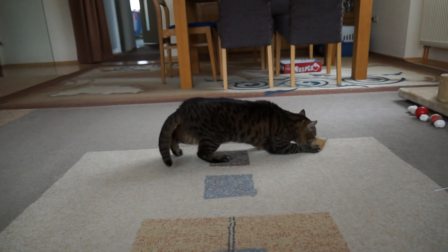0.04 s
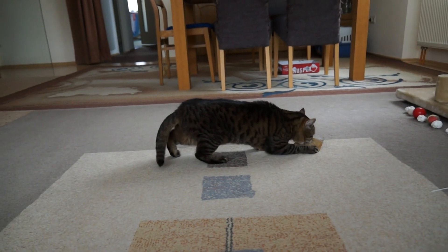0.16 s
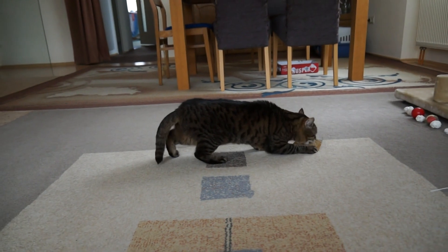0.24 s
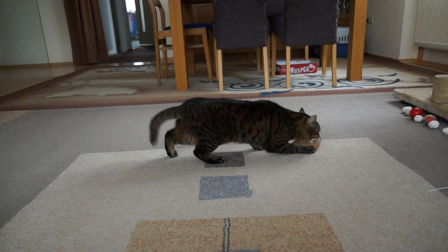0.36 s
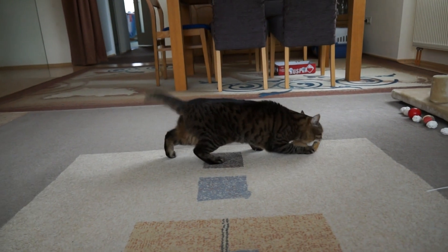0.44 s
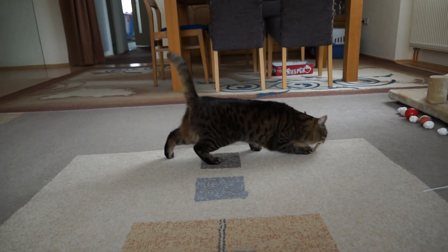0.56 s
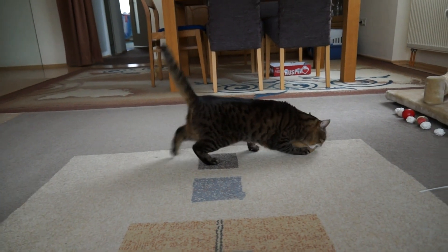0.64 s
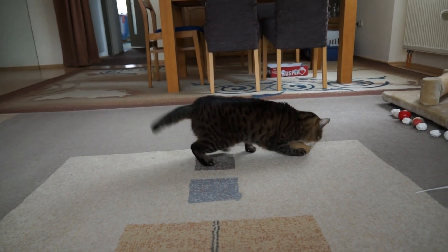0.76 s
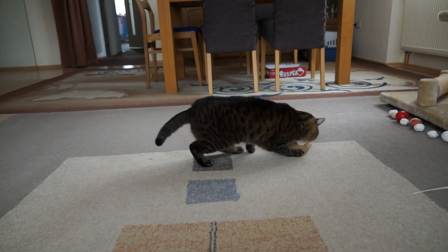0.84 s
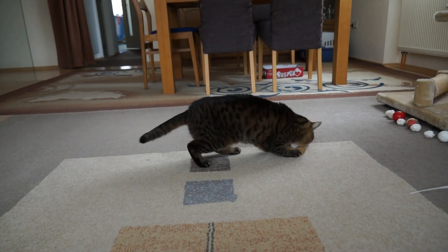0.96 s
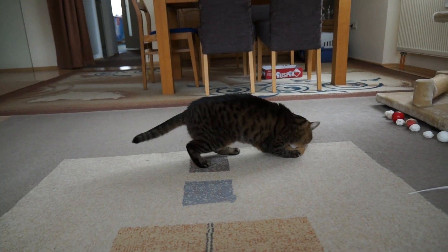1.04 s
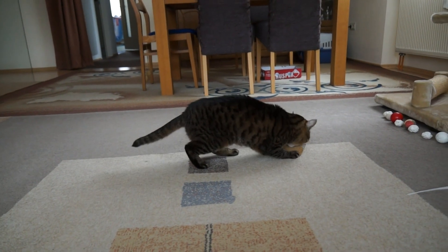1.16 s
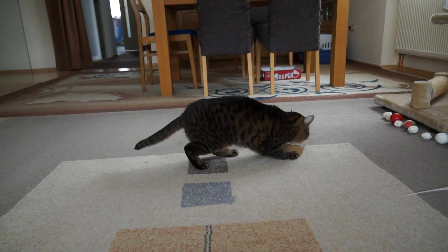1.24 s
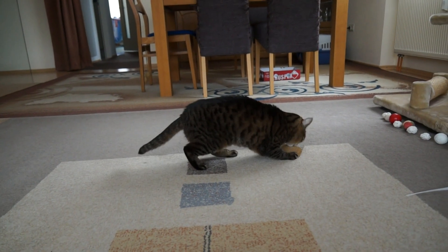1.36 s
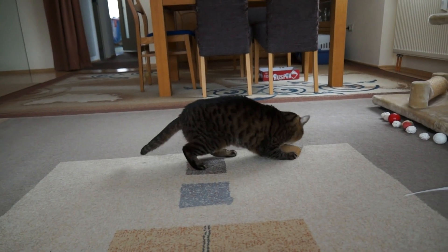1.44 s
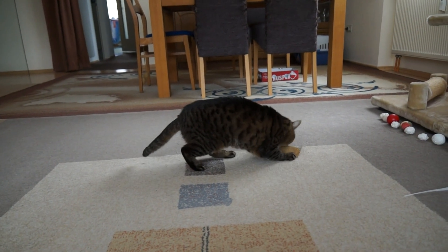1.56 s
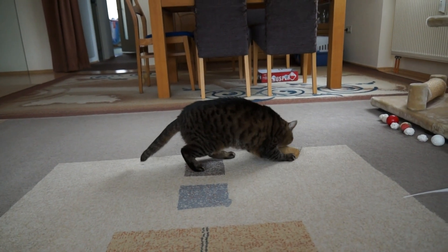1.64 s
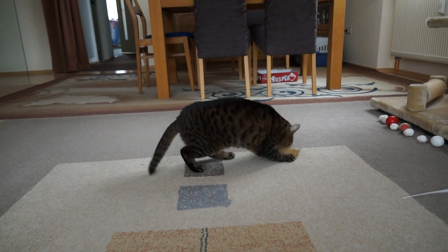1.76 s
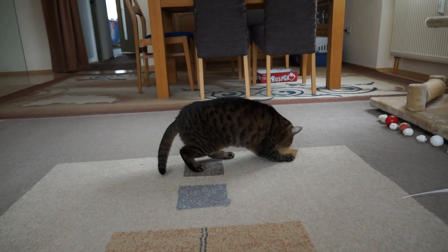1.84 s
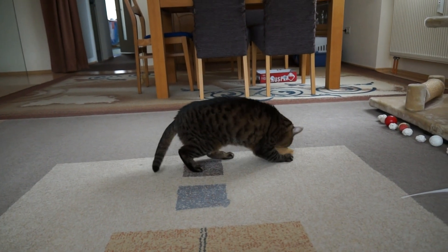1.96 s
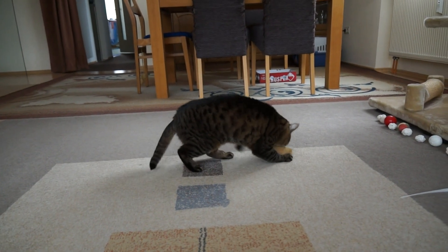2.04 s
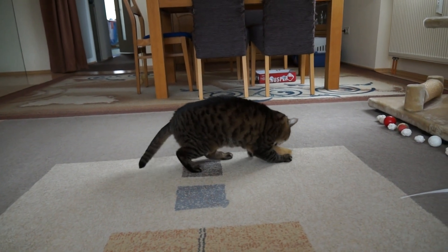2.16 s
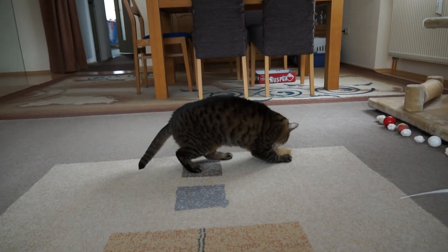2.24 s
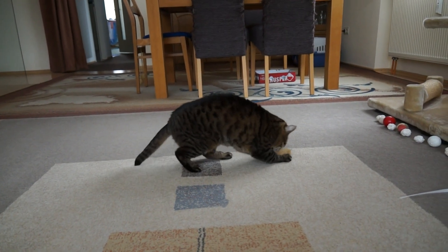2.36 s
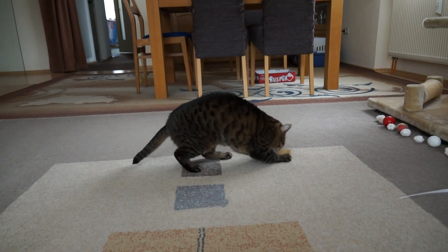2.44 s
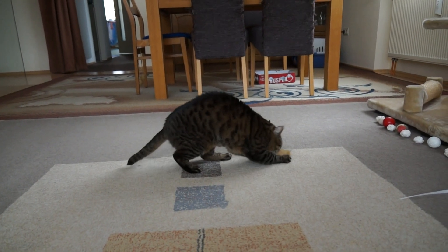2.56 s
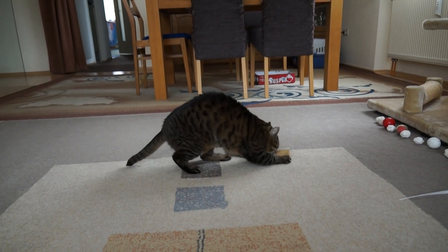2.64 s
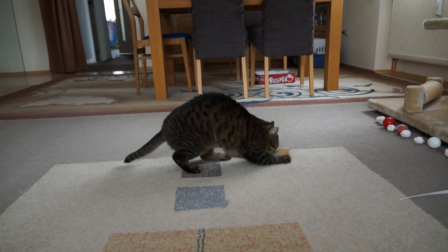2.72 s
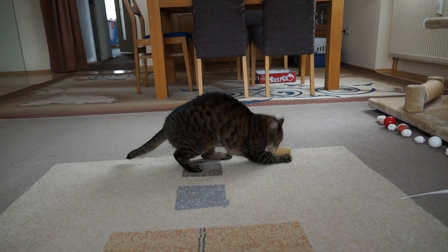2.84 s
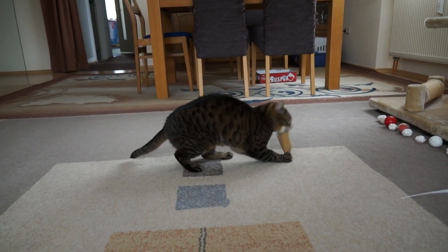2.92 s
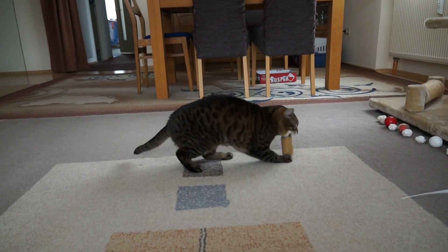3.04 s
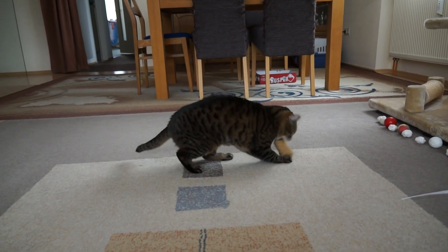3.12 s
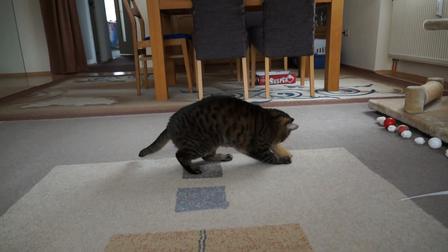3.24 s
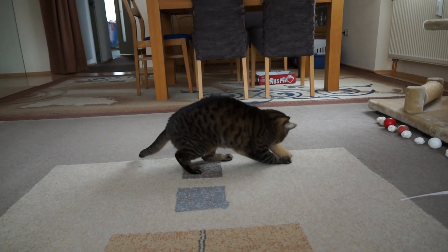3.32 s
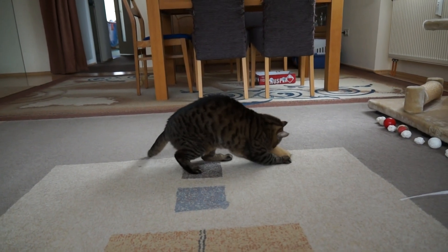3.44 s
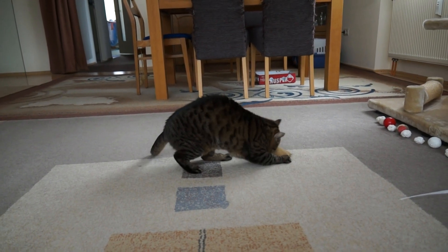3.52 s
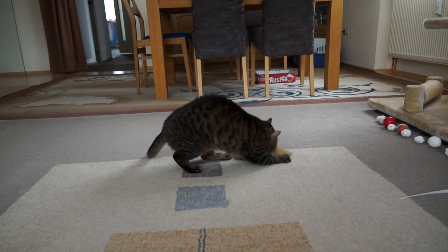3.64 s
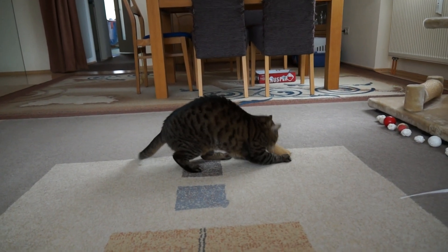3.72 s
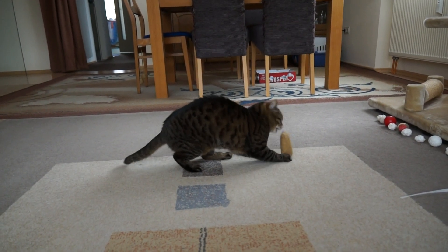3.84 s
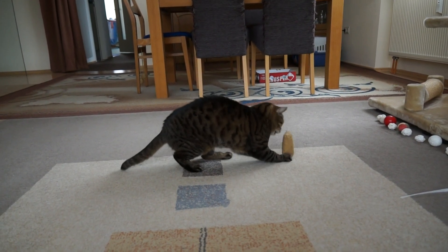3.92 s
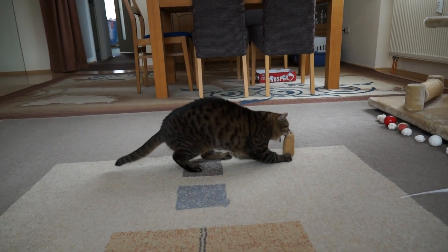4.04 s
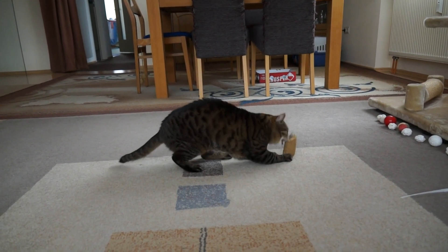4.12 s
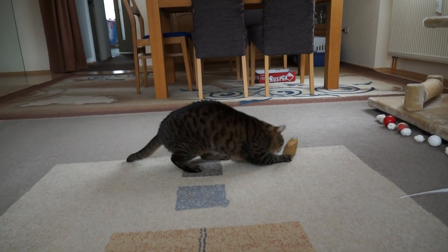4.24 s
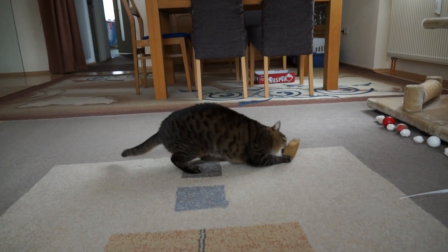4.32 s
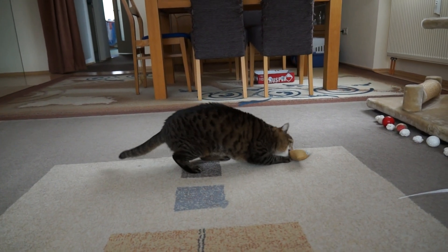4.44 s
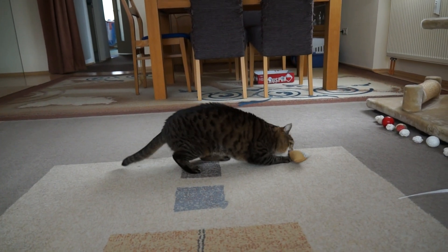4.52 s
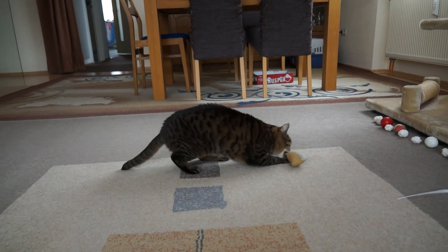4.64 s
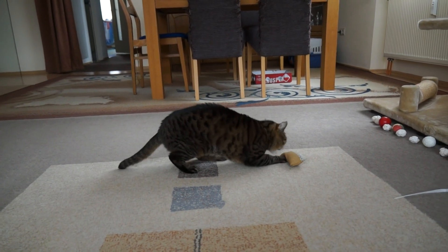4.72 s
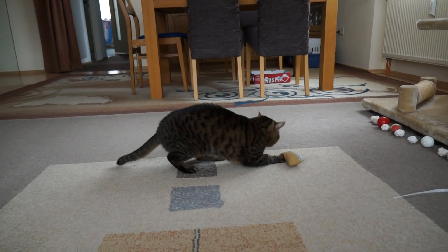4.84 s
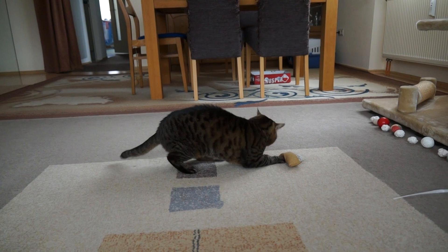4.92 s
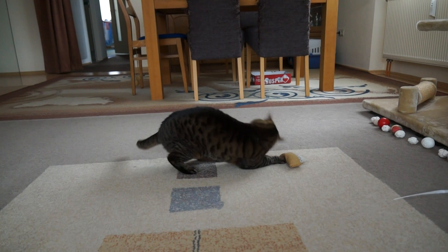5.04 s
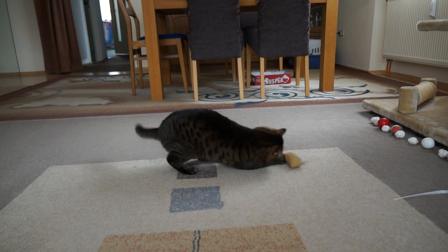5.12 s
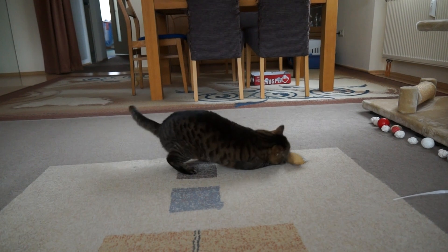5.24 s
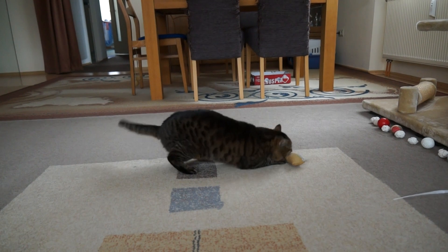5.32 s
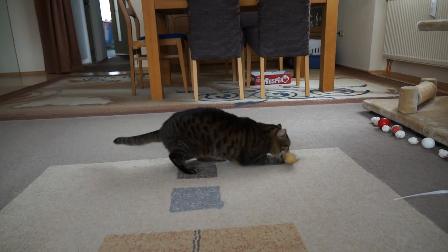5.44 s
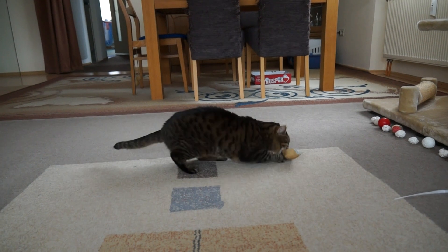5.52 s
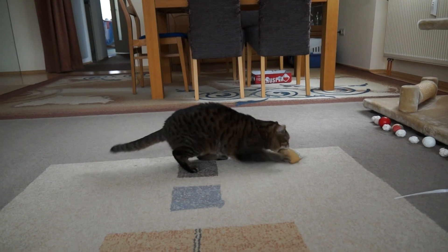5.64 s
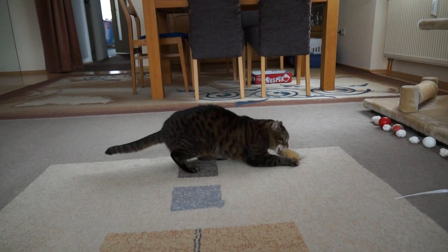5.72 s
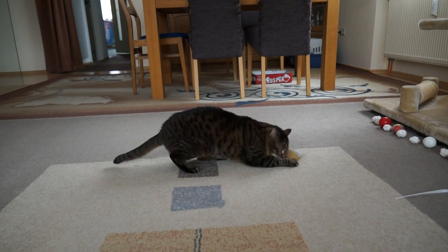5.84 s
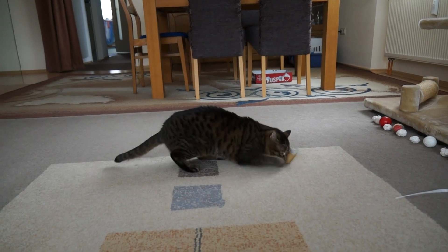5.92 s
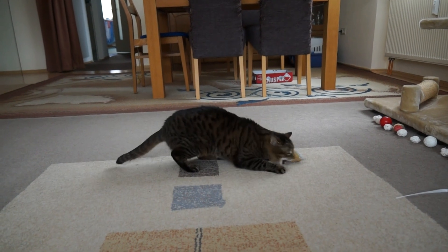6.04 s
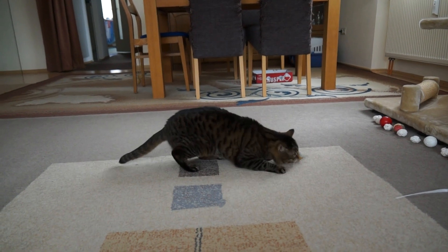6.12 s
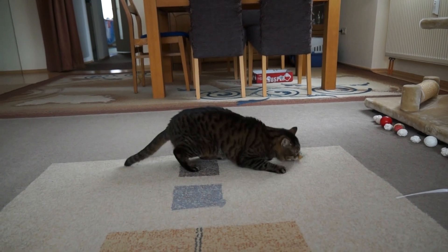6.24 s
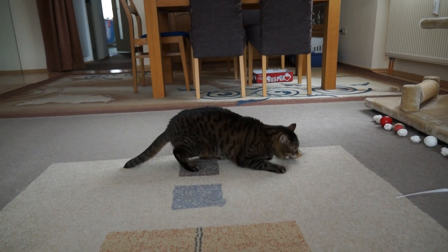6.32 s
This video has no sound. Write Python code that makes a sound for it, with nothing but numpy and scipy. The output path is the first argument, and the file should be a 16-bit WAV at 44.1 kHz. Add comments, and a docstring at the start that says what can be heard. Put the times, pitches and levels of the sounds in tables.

```python
"""A cat nuzzles, bites and paws a small stuffed cloth toy on a rug, heard from two metres on the floor.
Soft strokes of crackling fibres and scuffed pile come first, over a motor hum that fades in and steady hiss;
hard blows, bright rustle and thread snaps follow near 2 s and 3 s, then the sharpest snap and thump at 5.6 s;
the last strokes soften as the hum fades. Noise grains make the rubbing, wave bursts the snaps, damped rings
the thumps; scattered echoes of a furnished living room answer throughout."""
import sys
import numpy as np
from scipy import signal
from scipy.fft import rfft, irfft
from scipy.io import wavfile
from scipy.ndimage import uniform_filter1d

SR = 44100
rng = np.random.default_rng(int(sys.argv[2]) if len(sys.argv) > 2 else 0)


def bounce(signal):
    """Save signal as a 16-bit WAV file at the path given by the first command-line argument."""
    frames = np.transpose(np.atleast_2d(signal))
    limited = np.clip(frames, -1, 1)
    pcm = np.round(limited * 32767).astype(np.int16)
    wavfile.write(sys.argv[1], SR, pcm)


def to_linear_factor(level_db):
    """Convert decibel levels (scalar or array-like) to linear amplitude factors."""
    exponent = np.asarray(level_db, float) / 20
    return 10 ** exponent


N = 281358
TIME_S = np.arange(N) / SR

# Rubbing strokes of cloth and fur. Each row: peak in seconds, rustle gain in dB, rise in ms, fall in ms;
# rise and fall span 10 dB.
STROKES = [(0.07, -56, 360, 210), (0.225, -51.5, 67, 16), (0.44, -55.0, 19, 510), (0.618, -49, 35, 150),
           (0.904, -47, 38, 79), (1.02, -51, 14, 17), (1.086, -46, 64, 90), (1.203, -48, 30, 70),
           (1.358, -55.5, 9, 120), (1.586, -55, 3, 200), (1.609, -49, 25, 18), (1.695, -51, 2, 94),
           (1.795, -41.5, 37, 63), (1.9, -48.5, 150, 200), (1.997, -35, 3, 13), (2.028, -48.5, 170, 145),
           (2.14, -55, 9, 67), (2.362, -48.5, 12, 15), (2.471, -50.5, 370, 68), (2.56, -53, 8, 120),
           (2.661, -47.5, 70, 300), (2.945, -40, 105, 110), (2.979, -28.5, 2, 20), (3.099, -46, 43, 51),
           (3.272, -54, 80, 50), (3.425, -52.5, 33, 60), (3.607, -46, 87, 65), (3.75, -48.5, 92, 130),
           (3.855, -42.5, 68, 55), (4.028, -46, 3.7, 80), (4.189, -46, 40, 60), (4.368, -48.5, 8, 100),
           (4.455, -43.5, 13, 110), (4.547, -48.5, 150, 23), (4.632, -51.5, 12, 36), (4.726, -55, 130, 62),
           (5.155, -59, 8, 30), (5.25, -54.5, 7.4, 87), (5.418, -43.5, 59, 125), (5.501, -43, 15, 13),
           (5.567, -48.5, 92, 3), (5.64, -42.5, 52, 57), (5.759, -47, 8, 38), (5.956, -43.5, 35, 20),
           (6.04, -55, 85, 54), (6.192, -46, 27, 43), (6.275, -51, 88, 41), (6.36, -53, 33, 17)]
STROKE_EXPONENT = 1.32  # 1 pointed, 2 rounded
# Press of the toy into the rug, low while held in the mouth. Each row: time in seconds, scuff in dB re rustle.
PRESSURE = [(0, -8.5), (1.3, -9), (1.7, -7), (2.6, -6.5), (2.95, -13.5), (3.4, -15.5), (3.65, -10.5),
            (4.1, -20.5), (4.65, -8), (5.4, -11), (5.7, -3.5), (6.38, -10)]
# Paws dragging over the pile, dull only. Each row: peak in seconds, scuff gain in dB, rise in ms.
PAW_DRAGS = [(0.005, -56, 12), (0.66, -54, 45), (1.538, -56, 3.6), (1.696, -44.5, 2), (1.83, -54, 37),
             (3.772, -55, 33), (5.06, -66, 32), (5.15, -56.5, 6)]
DRAG_FALL_MS = 44

# Spectrum of slipping fibres. Each row: frequency in Hz, relative level in dB.
FIBRE_SPECTRUM = [(1180, -17.5), (2000, -21), (3140, -17), (5930, -7), (7640, -5), (8700, -2.5),
                  (10500, -1.5), (13300, -8.5), (15200, -17), (15900, -25)]
# Spectrum of scuffed pile. Each row: frequency in Hz, relative level in dB.
PILE_SPECTRUM = [(59, -80), (100, -18), (210, -7), (414, -4), (710, -5.5), (868, -4), (997, -3.5),
                 (3600, -18.5), (5200, -39), (8800, -120)]
SCUFF_WAVER_DB = 1.5

# Hardest threads snapping off claws and teeth. Each row: centre in seconds, peak in dB, pitch in Hz.
HARD_SNAGS = [(0.6136, -28, 10400), (0.6275, -29, 9600), (0.6536, -30, 10000), (0.6948, -30, 10100),
              (1.025, -26, 10600), (1.8046, -16, 9300), (1.9305, -28, 9600), (1.9971, -16, 8400),
              (2.659, -30, 10600), (4.5252, -26, 9200), (5.4954, -28, 7800), (5.5135, -25, 9800),
              (5.5846, -11.5, 8300), (5.594, -24, 5400), (5.5967, -26, 5500), (6.2549, -30, 9500),
              (6.2788, -28, 10800)]
FULL_SCALE_SNAG_CYCLES = 0.55  # half-length to 1/e; softer snaps are longer
LOOSE_SNAGS = 90  # small snaps at random times
LOOSE_RE_RUSTLE_DB, LOOSE_SCATTER_DB = 14, 2.2
LOOSE_HZ, LOOSE_LOG_SPREAD = 10300, 0.1

# Paws, teeth and toy striking. Each row: start in seconds, peak in dB, ring in Hz, ring t60 in ms.
THUMPS = [(0.714, -43.5, 3700, 11), (0.742, -46, 3750, 11), (1.6943, -29.5, 694, 7.2),
          (1.9857, -34, 1210, 4.7), (1.9972, -19, 1060, 4.7), (2.6556, -35.5, 1520, 11),
          (2.6652, -36, 1380, 4), (2.678, -37.5, 1550, 4), (2.9732, -29, 800, 6.9),
          (2.978, -21.5, 2444, 16), (4.73, -45, 5800, 8), (5.2128, -35.5, 2170, 4),
          (5.2445, -42.5, 1460, 6.1), (5.462, -41, 613, 14), (5.563, -32, 2680, 3),
          (5.5847, -14.5, 1240, 2.3), (5.5852, -28, 383, 48), (5.757, -45, 920, 4.9),
          (5.92, -34, 1730, 3.4), (5.9531, -37, 940, 6.5)]
SETTLE_S, SETTLE_DETUNE = 0.04, 0.66  # detune in Hz times t60 in s
REBOUND_DB, REBOUND_SLOPE = -0.5, 0.43  # re peak of a full-scale blow; softer blows rebound less

# Decay of the furnished room. Each row: frequency in Hz, t60 in seconds.
ROOM_T60 = [(150, 0.35), (500, 0.27), (1500, 0.29), (4000, 0.17), (12000, 0.03)]
# Echoes common to both channels. Each row: frequency in Hz, band level in dB.
ROOM_MID = [(150, -0.5), (1000, 1), (2000, 6), (2500, 8), (3500, 6), (4800, 1.5), (12000, -8)]
# Echoes opposed between channels. Each row: frequency in Hz, band level in dB.
ROOM_SIDE = [(150, -10), (1000, -1.5), (2500, 2.5), (4500, -15), (12000, 9.5)]
FIRST_ECHO_S = 0.0075
# Balance of the direct sound. Each row: frequency in Hz, left minus right in dB.
DIRECT_PAN = [(200, -3.5), (1500, -5), (6000, -2), (13000, 1)]

# Motor overtones. Each row: frequency in Hz, rms before swell and waver in dB.
HUM_OVERTONES = [(413, -74.5), (618, -78.5), (826, -77)]
# Swelling and fading of the hum. Each row: time in seconds, gain in dB.
HUM_SWELL = [(0, -9), (.3, 1), (1.4, 2), (2.2, -4), (3.2, -1.5), (4.6, 1), (5.0, 2.5), (5.5, 4.5),
             (5.9, -5), (6.38, -13)]

# Microphone hiss common to both channels. Each row: frequency in Hz, relative level in dB.
HISS_MID = [(15, -81), (25, -30), (100, -18.5), (260, -6.5), (420, -6), (530, -10.5), (800, -5.5),
            (1290, -13.5), (8600, -15.5), (14800, -19.5), (15900, -25)]
# Microphone hiss opposed between channels. Each row: frequency in Hz, relative level in dB.
HISS_SIDE = [(15, -71), (25, -43), (180, -9), (416, -4), (560, -9.5), (607, 1), (695, -9), (4250, -21),
             (6210, -27), (11300, -24.5), (16000, -27)]
HISS_MID_DB, HISS_SIDE_DB = -61.5, -58
MIC_LOW_HZ = 250


def level(x, rms_db):
    """Scales x to an rms level."""
    return x * to_linear_factor(rms_db) / np.sqrt(np.mean(x ** 2))


def read(points, hz):
    """Value of (Hz, value) points, straight on a log-frequency axis."""
    f, v = np.transpose(points)
    return np.interp(np.log(np.maximum(hz, 1)), np.log(f), v)


def colour(x, points):
    """Causal filter with the (Hz, dB) response, from the cepstrum of the log gain."""
    size = 2048
    gain_db = read(points, np.arange(size // 2 + 1) * SR / size)
    cepstrum = irfft(np.log(to_linear_factor(gain_db)), size)
    cepstrum[1:size // 2] *= 2  # fold to minimum phase
    cepstrum[size // 2 + 1:] = 0
    impulse = irfft(np.exp(rfft(cepstrum)), size)
    return signal.oaconvolve(x, impulse)[:len(x)]


def walk(rate_hz):
    """Random levels held 1 / rate_hz and slewed twice; spread 1."""
    hold = int(SR / rate_hz)
    steps = np.repeat(rng.standard_normal(N // hold + 1), hold)
    slewed = uniform_filter1d(uniform_filter1d(steps, hold), hold)[:N]
    return slewed / slewed.std()


def stroke_power(ms, peak_s, peak_db, rise_ms, fall_ms):
    """Power of one movement that peaks at peak_s."""
    lag_ms = ms - 1000 * peak_s
    span_ms = np.maximum(np.where(lag_ms < 0, rise_ms, fall_ms), 1)
    return to_linear_factor(peak_db - 10 * np.abs(lag_ms / span_ms) ** STROKE_EXPONENT) ** 2


def motion():
    """Gains of bright rustle and dull scuff, from strokes, pressure and drags."""
    ms = np.arange(int(1000 * N / SR) + 2.)
    bright = sum(stroke_power(ms, *row) for row in STROKES)
    pressed = to_linear_factor(np.interp(ms / 1000, *np.transpose(PRESSURE))) ** 2
    dragged = sum(stroke_power(ms, *row, DRAG_FALL_MS) for row in PAW_DRAGS)
    dull = bright * pressed + dragged
    return [np.interp(TIME_S, ms / 1000, np.sqrt(power)) for power in (bright, dull)]


def grains(share, scatter_db):
    """Stick-slip clicks on a share of the samples; most are small, a few jump out."""
    chance = rng.random(N)
    jump = rng.exponential(size=N)
    noise = rng.standard_normal(N)
    return (chance < share) * noise * to_linear_factor(scatter_db * np.minimum(jump, 6))


def rubbing(bright, dull):
    """Fibres slip in dense bright clicks, the pile gives coarser, duller ones."""
    patches = walk(70)  # the grip comes and goes within a stroke
    fibre = level(colour(grains(0.33, 2.0), FIBRE_SPECTRUM), -0.028)
    fibre = fibre * bright * to_linear_factor(1.26 * patches)
    pile = level(colour(grains(0.12, 2.3), PILE_SPECTRUM), -1.35)
    pile = pile * dull * to_linear_factor(SCUFF_WAVER_DB * (patches / 2 + walk(30)))
    return fibre + pile


def snags(bright):
    """Threads let go in bursts of a few cycles, hardest ones shortest; small ones follow the rustle."""
    out = np.zeros(N)
    t = np.arange(-64, 64) / SR
    when = rng.random(LOOSE_SNAGS)
    scatter = rng.standard_normal((LOOSE_SNAGS, 2))
    loose_s = np.clip(when * N / SR, 0.01, N / SR - 0.01)
    rustle_db = 20 * np.log10(np.interp(loose_s, TIME_S, bright))
    loose_db = rustle_db + LOOSE_RE_RUSTLE_DB + LOOSE_SCATTER_DB * scatter[:, 0]
    loose_hz = LOOSE_HZ * np.exp(LOOSE_LOG_SPREAD * scatter[:, 1])
    for s, db, hz in list(HARD_SNAGS) + list(zip(loose_s, loose_db, loose_hz)):
        i = int(s * SR)
        cycles = FULL_SCALE_SNAG_CYCLES * to_linear_factor(-db / 3.3)
        envelope = np.exp(-(t * hz / cycles) ** 2)
        out[i - 64:i + 64] += to_linear_factor(db) * np.cos(2 * np.pi * hz * t) * envelope
    return out


def add_ring(out, start_s, peak_db, hz, t60_s):
    """Adds one damped ring in place."""
    t = np.arange(int(1.2 * t60_s * SR) + 8) / SR
    ring = np.sin(2 * np.pi * hz * t) * 1000. ** (-t / t60_s)
    i = int(start_s * SR)
    out[i:i + len(t)] += (ring * to_linear_factor(peak_db) / ring.max())[:N - i]


def thumps():
    """A short ring at the contact, and the stuffing settling in six weaker rebounds."""
    out = np.zeros(N)
    chance = rng.random((len(THUMPS), 6, 2))
    for (s, db, hz, t60_ms), rebounds in zip(THUMPS, chance):
        t60_s = max(t60_ms, 1) / 1000
        add_ring(out, s, db, hz, t60_s)
        spread_hz = min(SETTLE_DETUNE / t60_s, hz / 2)  # a shorter ring changes its note more
        rebound_db = db + REBOUND_DB + REBOUND_SLOPE * db
        for late, detune in rebounds:
            rebound_s = s + 0.00204 + SETTLE_S * late
            rebound_hz = hz + spread_hz * (2 * detune - 1)
            add_ring(out, rebound_s, rebound_db - 9 * late, rebound_hz, t60_s)
    return out


def room(x, points):
    """Scattered wall echoes thicken into a tail that dies first in the treble."""
    t = np.arange(int(0.7 * SR)) / SR
    after_first = t > FIRST_ECHO_S
    echoes = rng.standard_normal(len(t)) * (rng.random(len(t)) < 0.02 + 4.0 * t) * after_first
    spectrum = rfft(echoes)
    f_hz = np.fft.rfftfreq(len(t), 1 / SR)
    tail = 0
    for hz in 125 * 2. ** np.arange(8):
        weight = np.maximum(1 - np.abs(np.log2(np.maximum(f_hz, 125) / hz)), 0)  # octave triangle
        band = irfft(spectrum * weight, len(t))
        decay = 1000. ** (-t / read(ROOM_T60, hz)) * after_first
        norm = np.sqrt(np.mean(echoes ** 2) * np.sum(decay ** 2))
        tail = tail + band * decay / norm * to_linear_factor(read(points, hz))
    return signal.fftconvolve(x, tail)[:N]


def hum():
    """Overtones of a distant motor, wavering in level and a little in pitch."""
    drift = 1 + 0.004 * walk(1.5)
    swell_db = np.interp(TIME_S, *np.transpose(HUM_SWELL))
    out = np.zeros(N)
    for hz, db in HUM_OVERTONES:
        gain = to_linear_factor(db + swell_db + 0.81 * walk(4.55)) * np.sqrt(2)
        out += gain * np.sin(2 * np.pi * hz * np.cumsum(drift) / SR)
    return out


def stereo(mid, side):
    """Left is mid plus side, right is mid minus side."""
    return mid + side * np.array([[1], [-1]])


def hiss():
    """Microphone self-noise: separate coloured noises in mid and side make it wide."""
    mid = level(colour(rng.standard_normal(N), HISS_MID), HISS_MID_DB)
    side = level(colour(rng.standard_normal(N), HISS_SIDE), HISS_SIDE_DB)
    return stereo(mid, side)


def scene():
    """Direct sound leans right below the top treble; echoes are wide, the hum leans right."""
    bright, dull = motion()
    cat = rubbing(bright, dull) + snags(bright) + thumps()
    left = colour(cat, [(hz, db / 2) for hz, db in DIRECT_PAN])
    right = colour(cat, [(hz, -db / 2) for hz, db in DIRECT_PAN])
    motor = hum()
    mid = room(cat, ROOM_MID) + motor
    side = room(cat, ROOM_SIDE) - 0.46 * motor
    return np.array([left, right]) + stereo(mid, side)


def top_cut(x):
    """Nothing passes above the cut-off."""
    return signal.sosfilt(signal.butter(12, 15850, fs=SR, output="sos"), x)


def record(dry):
    """Small microphones lose the bass and add their own wide hiss."""
    high_pass = signal.butter(4, MIC_LOW_HZ, "high", fs=SR, output="sos")
    thin = signal.sosfilt(high_pass, dry)
    mix = thin + hiss()
    return top_cut(mix)


dry = scene()
out = record(dry)
bounce(out)
```